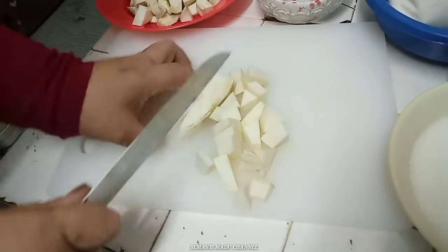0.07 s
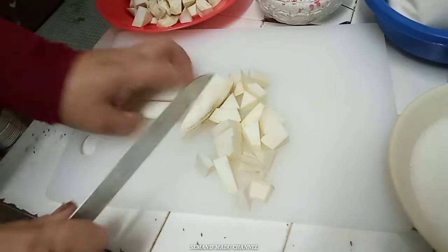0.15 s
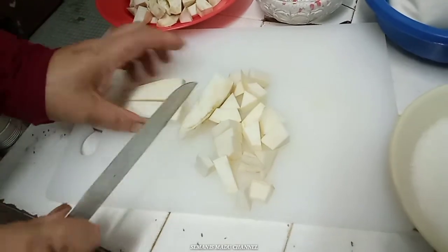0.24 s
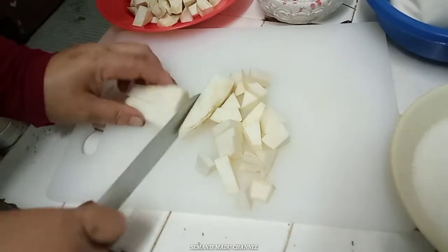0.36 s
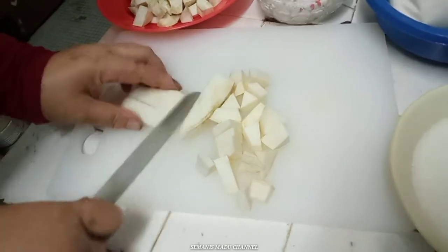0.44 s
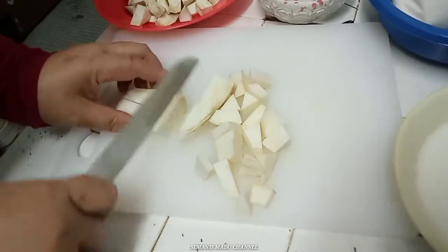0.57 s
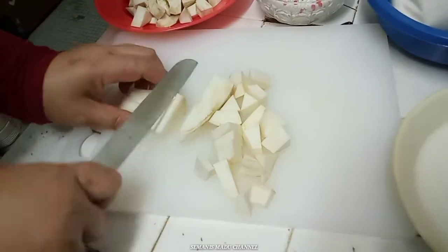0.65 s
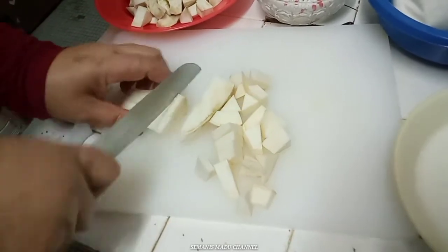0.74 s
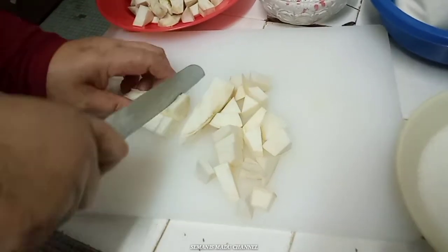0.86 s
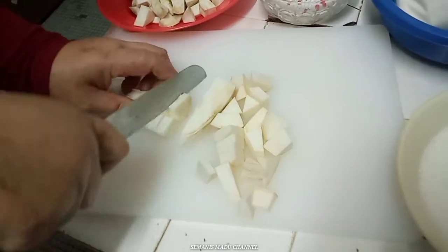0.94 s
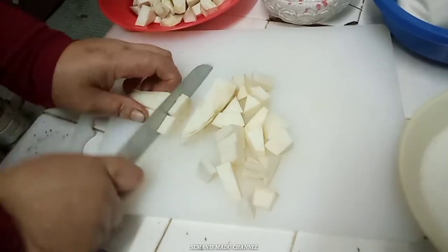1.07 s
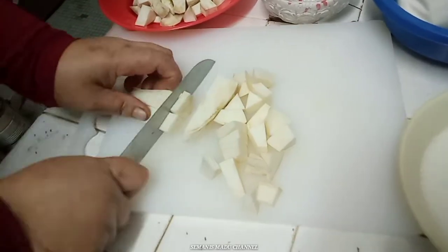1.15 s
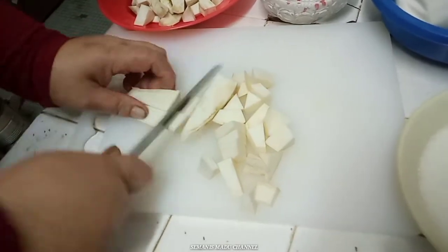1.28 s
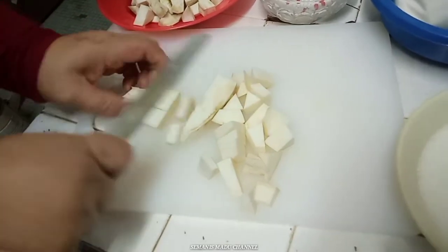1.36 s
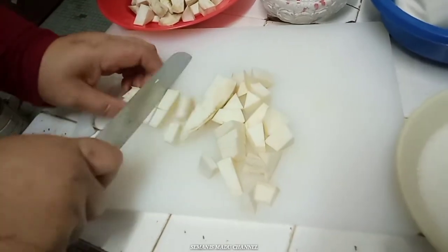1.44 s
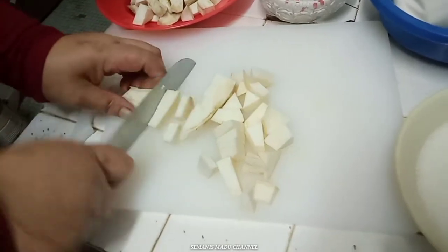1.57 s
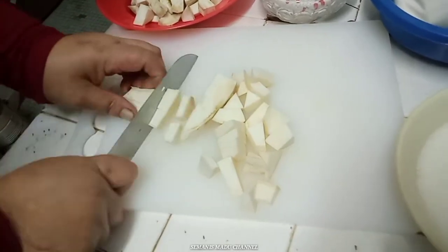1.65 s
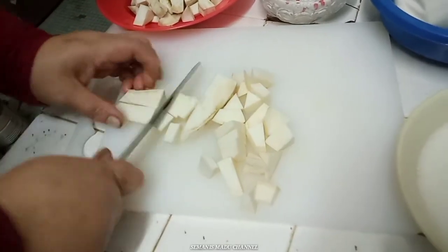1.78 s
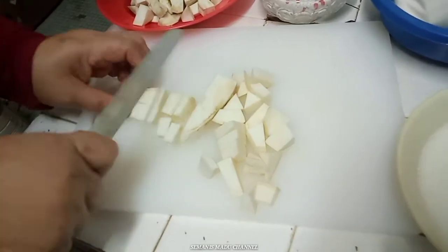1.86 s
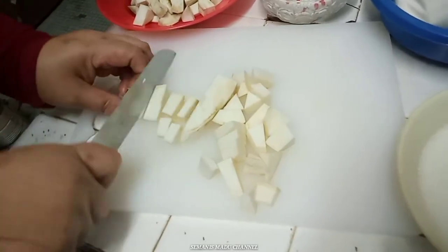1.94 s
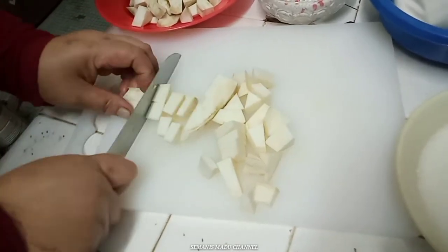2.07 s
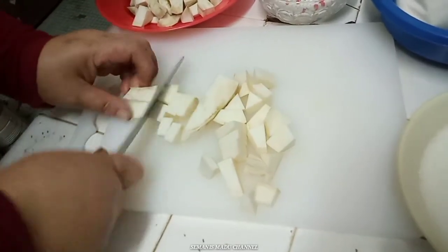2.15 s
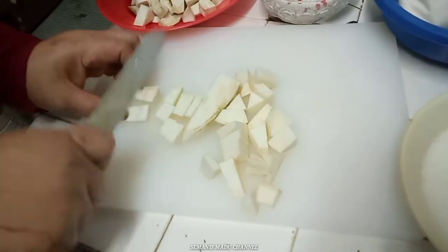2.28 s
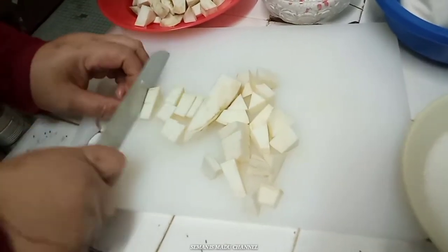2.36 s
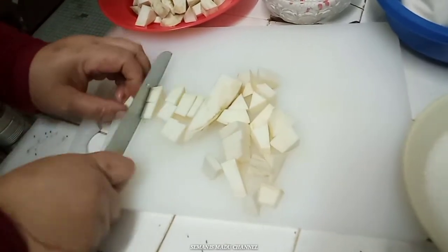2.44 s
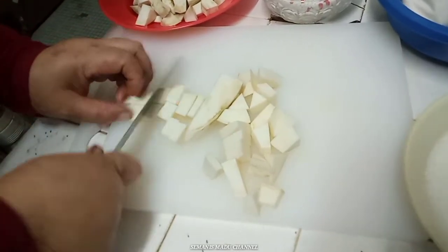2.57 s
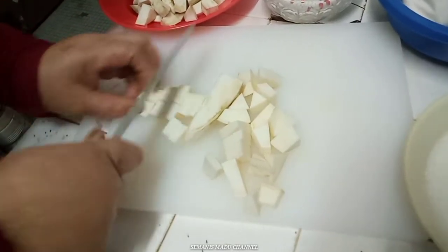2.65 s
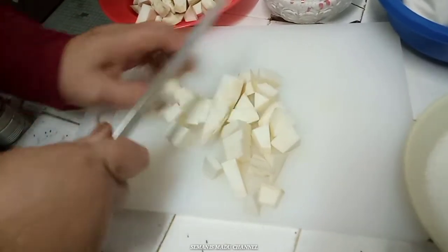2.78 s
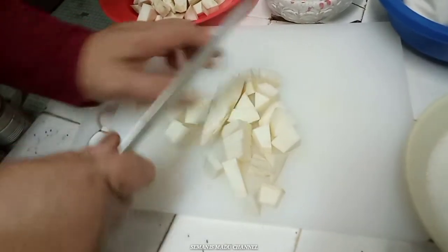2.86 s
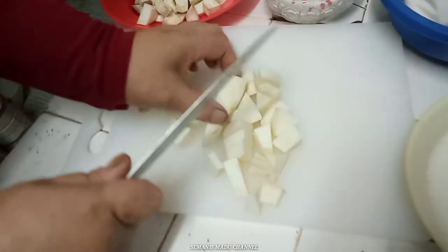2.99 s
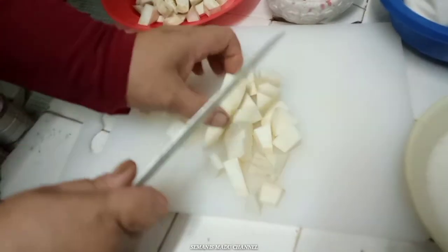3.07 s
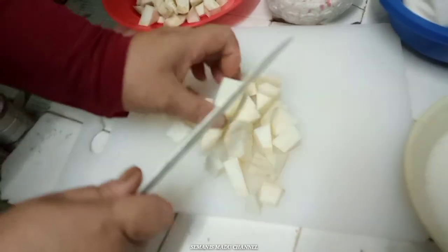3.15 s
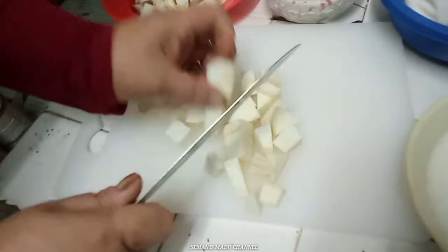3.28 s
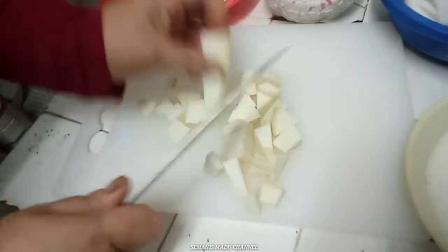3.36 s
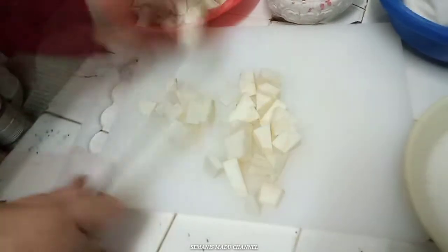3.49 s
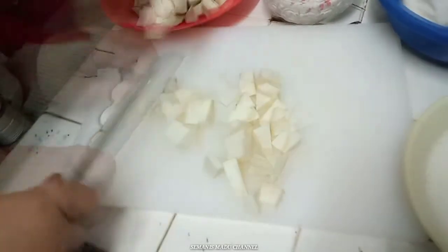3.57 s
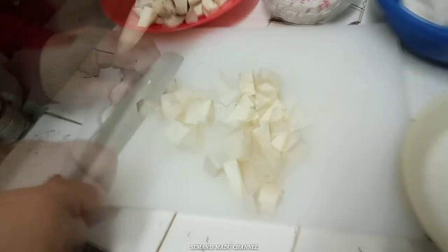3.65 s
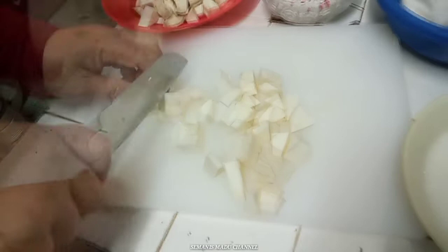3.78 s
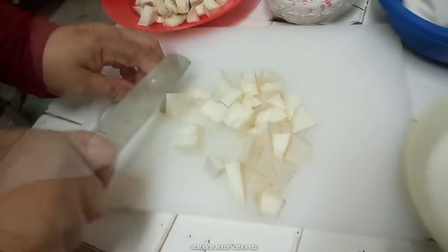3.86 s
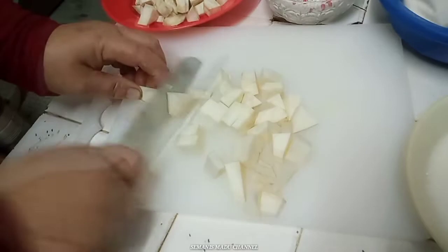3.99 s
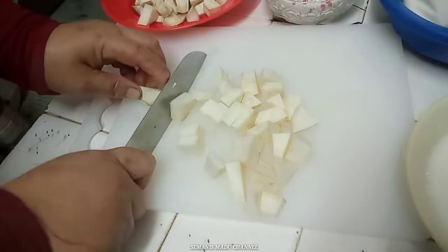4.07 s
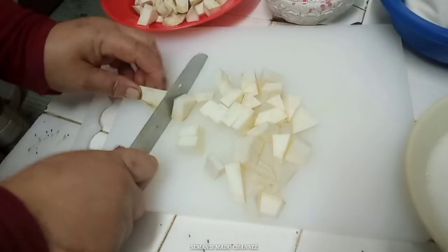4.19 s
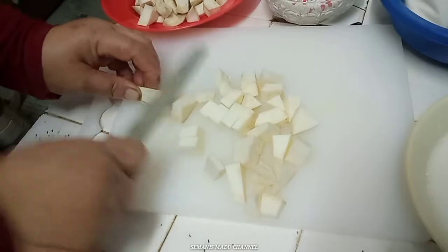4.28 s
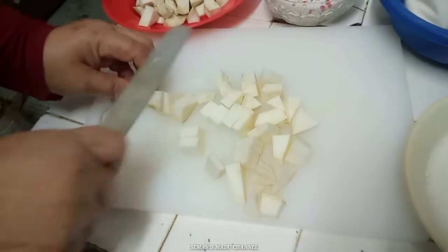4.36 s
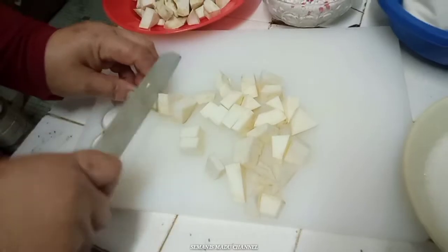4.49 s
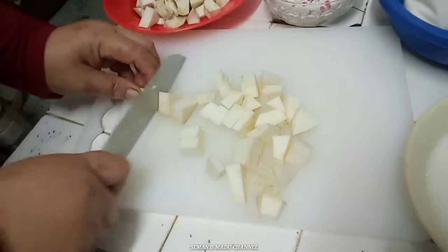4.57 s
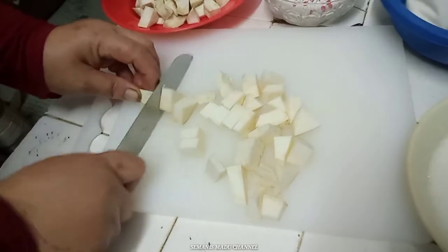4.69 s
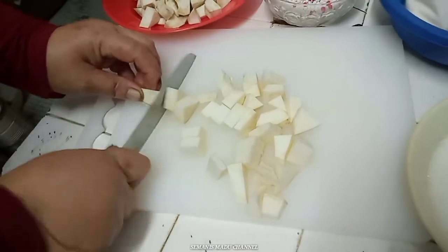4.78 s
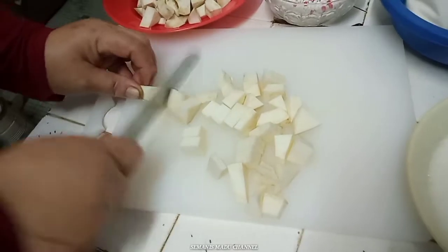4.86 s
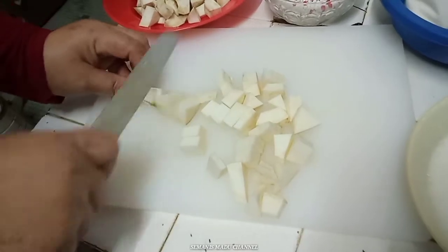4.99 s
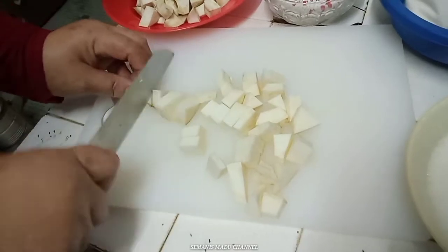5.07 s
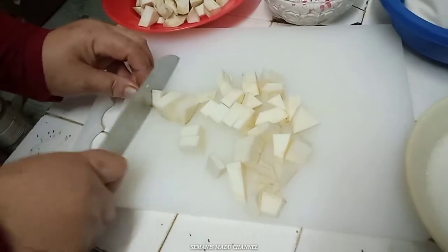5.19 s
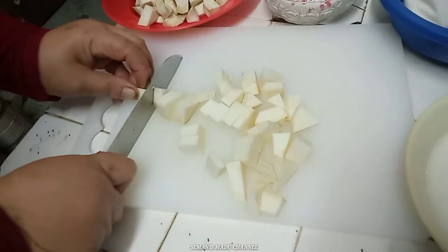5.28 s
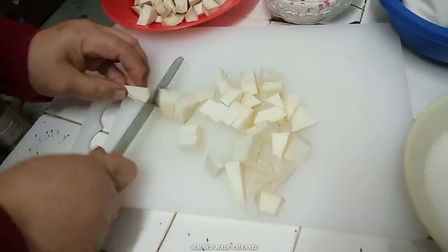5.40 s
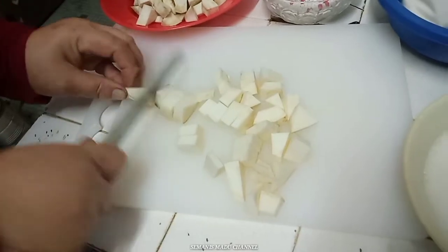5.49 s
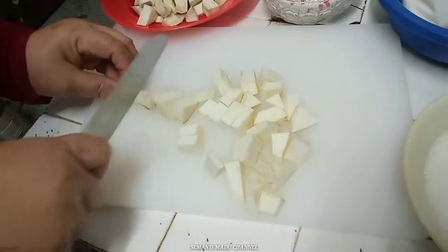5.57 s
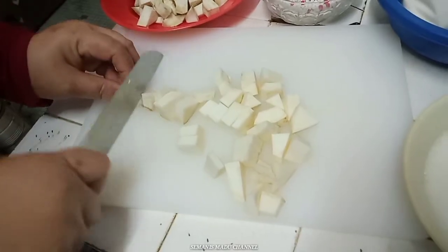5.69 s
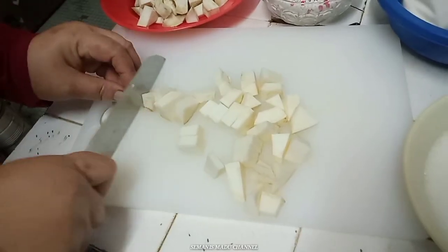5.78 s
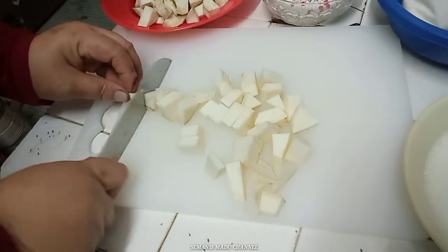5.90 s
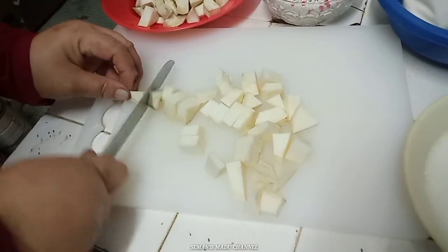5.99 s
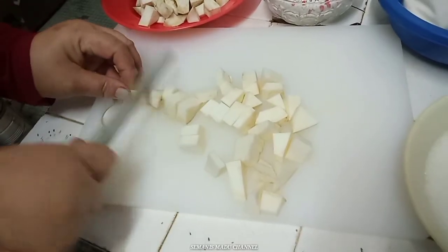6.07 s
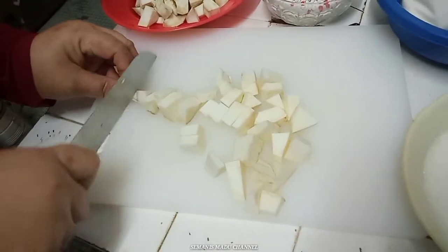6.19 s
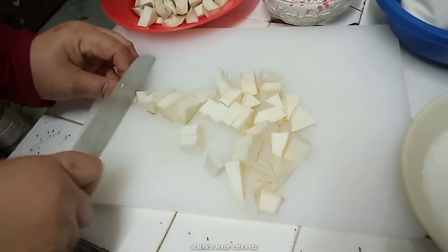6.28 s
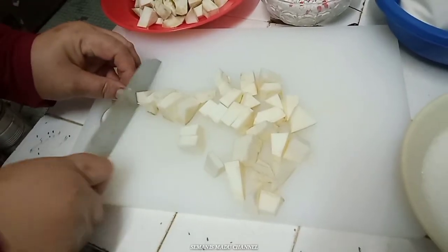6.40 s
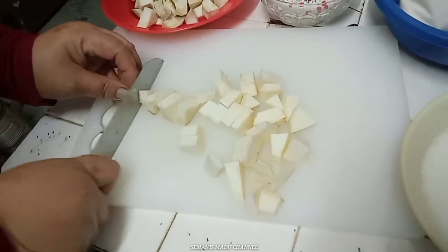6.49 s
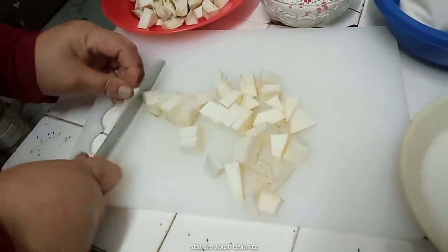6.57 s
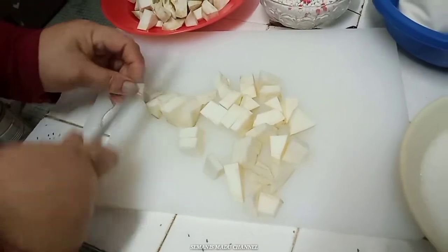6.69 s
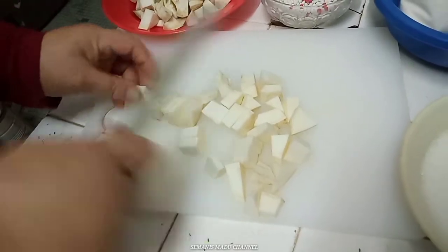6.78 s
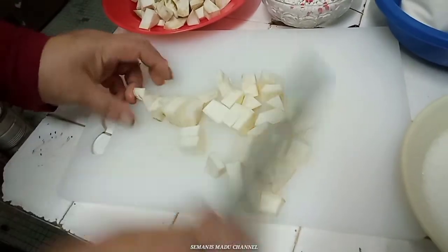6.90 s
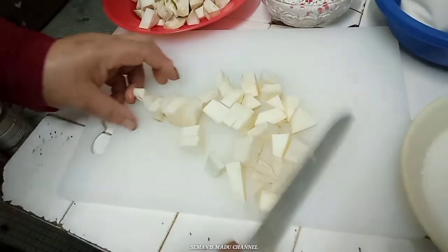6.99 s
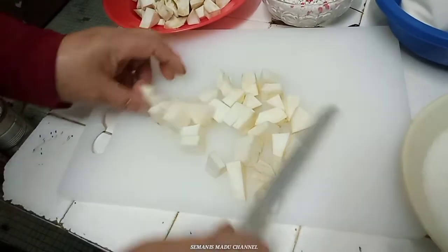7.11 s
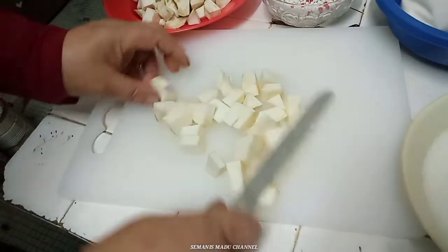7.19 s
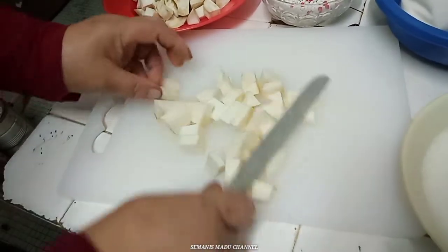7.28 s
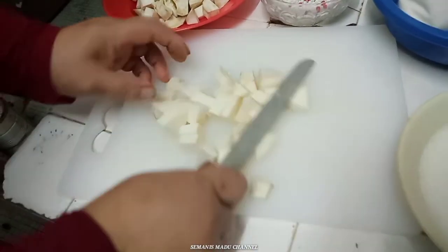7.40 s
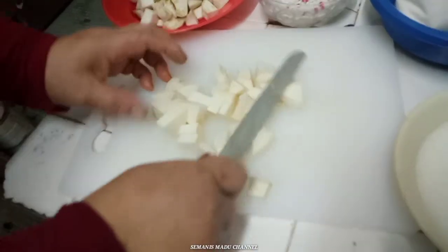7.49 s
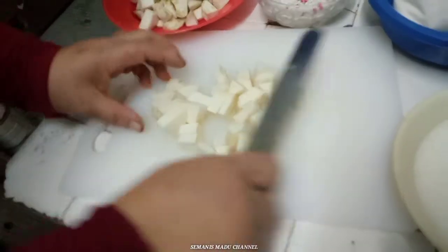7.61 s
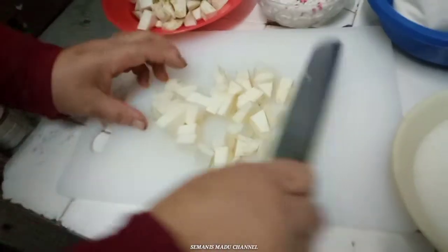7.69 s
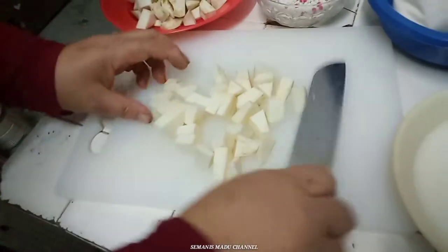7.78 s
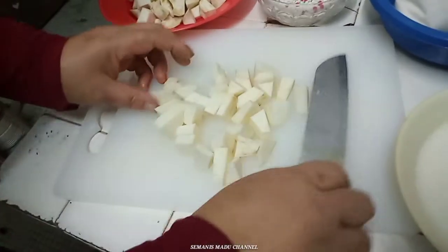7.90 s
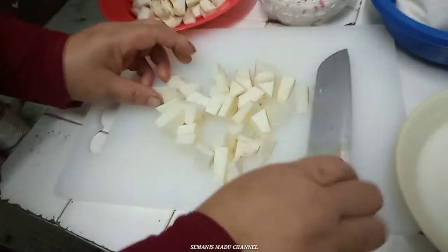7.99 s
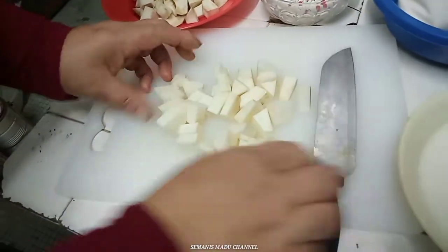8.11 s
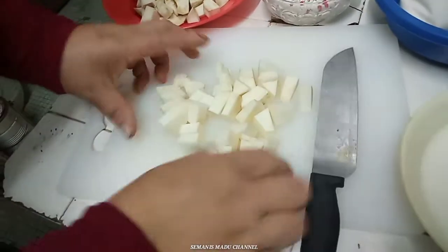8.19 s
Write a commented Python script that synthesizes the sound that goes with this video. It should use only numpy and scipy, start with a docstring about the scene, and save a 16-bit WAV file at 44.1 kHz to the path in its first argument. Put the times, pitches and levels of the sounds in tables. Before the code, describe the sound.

A knife dices a firm vegetable on a plastic board with sharp knocks over a low hum, then clatters down, ringing.

```python
"""Dicing a vegetable in a tiled kitchen

One microphone close to a plastic board, a low steady hum behind it. The knife rasps through firm flesh
and knocks on the board, hard enough that the loudest knocks clip; cubes bump softly between the cuts.
The sound drops out and fades back in. At the end the knife clatters down and its steel rings."""
import sys
import numpy as np
from scipy import signal
from scipy.fft import rfft, irfft, next_fast_len
from scipy.io import wavfile

SR = 44100
rng = np.random.default_rng(int(sys.argv[2]) if len(sys.argv) > 2 else 0)


def store_wav(level_fs):
    """Save 16-bit WAV to argv[1]."""
    pcm = np.round(np.clip(np.atleast_2d(level_fs), -1, 1) * 32767)
    wavfile.write(sys.argv[1], SR, pcm.T.astype(np.int16))


N = 363825
TIME = np.arange(N) / SR

# the edge hits the board: (t/s, force/dB, bass/dB, treble/dB, room/dB, number of blows, level dip/dB)
CHOPS = [(0.8411, 1.2, 5.5, -13, -10.5, 1, 0), (1.4632, 0.5, -6.5, -23, -7, 4, -2.5),
         (1.9491, 12.5, -8.5, 6, -10.5, 1, 6), (2.3424, 5.5, -9.5, -2, -4.5, 1, 4.5),
         (4.0281, 18.5, -34, -10, -9, 1, 6), (4.6800, 5.5, 7.5, -26, -5, 1, 1),
         (5.2663, 12, -3.5, -12, -8.5, 1, 0.5), (5.8820, 18, -7, 2, -12.5, 1, 11.5),
         (6.4470, 10.5, -1, -2, -10, 1, 0.5)]
# spectrum of moist flesh crackling: (f/Hz, level/dB)
CRACKLE = [(1000, -12), (3800, 6.5), (5200, 2.5), (9000, -11), (11000, -21), (15500, -13)]


def from_db(db):
    """Decibels to gain."""
    return 10 ** (np.asarray(db) / 20)


def rms_one(x):
    """Scale to rms 1."""
    return x / np.sqrt(np.mean(x ** 2) + 1e-20)


def at_hz(points, hz):
    """Read a table on a log-frequency axis."""
    knots, values = np.transpose(points)
    return np.interp(np.log(np.maximum(hz, 1)), np.log(knots), values)


def add(track, s, sound):
    """Mix a sound in at s seconds."""
    at = round(s * SR)
    track[at:at + len(sound)] += sound[:max(N - at, 0)]


def butter(x, hz, kind, order):
    """Causal Butterworth filter."""
    return signal.sosfilt(signal.butter(order, hz, kind, fs=SR, output="sos"), x)


def colour(x, spectrum):
    """Give a steady signal a spectrum; rms 1."""
    size = next_fast_len(len(x))
    gain = from_db(at_hz(spectrum, np.fft.rfftfreq(size, 1 / SR)))
    return rms_one(irfft(rfft(x, size) * gain, size)[:len(x)])


def resonate(x, hz, width):
    """Resonance with gain 1 at its peak; width in Hz."""
    r = np.exp(-np.pi * width / SR)
    feedback = [1, -2 * r * np.cos(2 * np.pi * hz / SR), r * r]
    return signal.lfilter(np.array([1, 0, -1]) * (1 - r * r) / 2, feedback, x)


def grains(per_s, spread_db, size):
    """Random clicks of uneven strength and sign."""
    strength = from_db(spread_db * np.minimum(rng.exponential(1, size), 4))
    return strength * rng.choice([-1, 1], size) * (rng.random(size) < per_s / SR)


def hum(rush_db=-40.5):
    """Room tone: a steady low rush with a few blurred tones."""
    # spectrum of the rush: (f/Hz, level/dB)
    rush_spectrum = [(20, -8), (55, -13), (85, -4), (135, -1), (420, -1), (560, -5.5), (1100, -6),
                     (2300, -14), (3700, -12.5), (4600, -18), (5100, -22.5), (8500, -33.5), (11000, -51.5),
                     (15500, -47)]
    # tones in the hum: (f/Hz, width/Hz, level/dB)
    drone = [(143.4, 37, -53.5), (230.9, 24, -52), (467.4, 17, -51), (684, 23, -63.5), (967, 48, -54.5),
             (1753, 15, -60.5)]
    tones = np.zeros(N)
    for hz, width, db in drone:
        band = resonate(rng.standard_normal(N), hz, width)
        tones += from_db(db) * rms_one(resonate(band, hz, width))
    return from_db(rush_db) * colour(rng.standard_normal(N), rush_spectrum) + tones


def kitchen_response(build_s=0.0011, wall_s=0.038, wall_spread_s=0.0053, wall_db=3):
    """Diffuse reverberation that swells as the far walls answer and dies band by band; energy 1."""
    # decay of the tiled room: (f/Hz, t60/s)
    decay_times = [(200, 0.57), (1000, 0.4), (2000, 0.43), (3200, 0.29), (4500, 0.15), (12000, 0.45)]
    t = TIME[:SR // 2]
    edges_hz = np.geomspace(60, 17000, 15)
    white = rng.standard_normal((2, len(t)))
    tail = np.zeros(len(t))
    for k, (low, high) in enumerate(zip(edges_hz, edges_hz[1:])):
        t60 = at_hz(decay_times, np.sqrt(low * high))
        tail += butter(white[k % 2], [low, high], "band", order=2) * from_db(-60 * t / t60)
    swell = from_db(wall_db * np.exp(-((t - wall_s) / wall_spread_s) ** 2))
    build = 1 - np.exp(-t / build_s)
    return rms_one(tail * swell * build) / np.sqrt(len(t))


def in_room(sound, room_db):
    """What reaches the microphone: direct sound, near echoes and a tail drawn anew each time."""
    # reflections off counter, bowls and walls: (delay/s, gain)
    echoes = [(.0022, .16), (.0036, -0.24), (.0060, 0.035), (0.0107, 0.18), (0.0325, 0.032),
              (.0430, -0.021)]
    response = from_db(room_db) * kitchen_response()
    response[0] += 1
    for delay, gain in echoes:
        response[round(delay * SR)] += gain
    return signal.fftconvolve(sound, response)


def board(force, bass_db, treble_db, contact_hz, spread_hz=1550, radiate_hz=170):
    """The damped board; where and how it is hit tilts its modes, and the contact time cuts the top."""
    # modes of the plastic board: (f/Hz, width/Hz, level/dB)
    modes = [(265, 240, -16.5), (423.4, 200, -19), (754, 190, -10.5), (1078, 160, -3.5), (1420, 183, -3.5),
             (1886, 360, -4.5), (2470, 240, -10), (2850, 740, -4), (3440, 240, -17)]
    tilt = [(600, bass_db), (1450, 0.012), (2900, treble_db)]
    body = sum(resonate(force, hz, width) * from_db(db + at_hz(tilt, hz)) for hz, width, db in modes)
    # bending waves disperse: all-passes spread the blow over a few cycles
    for hz in (1400, 2700):
        body = body - 2 * resonate(body, hz, spread_hz)
    body = butter(body, radiate_hz, "high", order=2)  # a small plate radiates no deep bass
    body = butter(body, contact_hz, "low", order=4)
    return butter(body, 3900, "low", order=6)


def bumps(level_db=24, crackle_db=-22, room_db=-5):
    """Moist cubes cushion a contact into a cluster of tiny blows; crisp ones last longer and crackle."""
    # soft bumps of blade and cubes: (t/s, level/dB, crispness 0-1)
    contacts = [(1.064, -17, 0), (1.208, -16.5, 0.62), (1.434, -22, .9), (1.529, -20.5, 0.8),
                (1.705, -22.5, 0.85), (1.921, -11.5, 0.8), (2.103, -17.5, 0.94), (2.251, -23.5, 0.88),
                (2.313, -14, .8), (2.503, -13, .75), (6.358, -18.5, 0.64), (6.587, -14, 0.8),
                (7.147, -23.5, 0.05), (7.565, -23, .05), (8.177, -6, 0.1), (8.218, -9, .6)]
    # a dull bump and a crisp snap of the flesh: (decay/s, bass/dB, treble/dB, crackle/dB)
    dull, crisp = np.array([(0.0025, 14.5, -25.5, -15), (0.01, 5, 6, -0.5)])
    out, t = np.zeros(N), TIME[:SR // 10]
    for s, db, crispness in contacts:
        decay_s, bass_db, treble_db, wet_db = dull + crispness * (crisp - dull)
        fade = np.exp(-t / decay_s)
        force = rms_one(grains(3300, spread_db=2.8, size=len(t)) * fade) / np.sqrt(len(t))
        thud = from_db(level_db) * board(force, bass_db, treble_db, contact_hz=3900)
        clicks = colour(grains(1800, spread_db=7, size=len(t)), CRACKLE)
        crackle = from_db(crackle_db + wet_db) * clicks * fade
        add(out, s, from_db(db) * (thud + crackle))
    return in_room(out, room_db)[:N]


def squeak(hz=2850, width_hz=300, slips_per_s=58, slip_s=0.0023):
    """Flesh sticks and slips on the side of the blade, an uneven train of short chirrs; rms 1."""
    slip_times = np.append(0, np.cumsum(rng.uniform(0.6, 1.4, size=1000)) / slips_per_s)
    since_slip = TIME - slip_times[np.searchsorted(slip_times, TIME, "right") - 1]
    friction = rng.standard_normal(N) * np.exp(-since_slip / slip_s)
    return rms_one(resonate(resonate(friction, hz, width_hz), hz, 2 * width_hz))


def slices(cells_per_s=900, crackle_db=-58, release_s=0.032, room_db=-6):
    """Cells burst along the edge and the flesh squeaks as pressure builds through each stroke."""
    # the blade passes through the flesh: (start/s, end/s, rasp/dB, squeak/dB)
    strokes = [(0.941, 0.987, -31, -66), (1.871, 1.903, -35.5, -41), (2.278, 2.304, -35, -44),
               (4.46, 4.686, -47.5, -47), (5.107, 5.266, -41, -41.5), (5.676, 5.856, -43.5, -45),
               (6.307, 6.44, -43, -38)]
    # spectrum of the bursting cells: (f/Hz, level/dB)
    flesh_spectrum = [(300, -14.5), (900, 3), (1800, -0.5), (3900, -5.5), (5200, -21.5), (9000, -31.5),
                      (15500, -46.5)]
    rasp = colour(grains(cells_per_s, spread_db=3.5, size=N), flesh_spectrum)
    crackle = from_db(crackle_db) * colour(grains(600, spread_db=3, size=N), CRACKLE)
    chirr = squeak()
    out = np.zeros(N)
    for start, end, rasp_db, squeak_db in strokes:
        pressure = np.sqrt(np.interp(TIME, [start, end, end + release_s], [0, 1, 0]))
        out += pressure * (from_db(rasp_db) * rasp + crackle + from_db(squeak_db) * chirr)
    return in_room(out, room_db)[:N]


def shimmer(t, spectrum, level_db=-24, t60=0.22):
    """A crowd of weak high modes of the steel rings on after a clash."""
    hz = rng.uniform(4500, 15500, size=(90, 1))
    partials = from_db(at_hz(spectrum, hz)) * np.sin(2 * np.pi * (hz * t + rng.random(hz.shape)))
    return rms_one(partials.sum(axis=0)) * from_db(level_db - 60 * t / t60)


def clinks(attack_s=0.00063, clash_s=0.0095, damping_db_per_s=220, room_db=-9):
    """Steel buzzes on a hard surface for an instant, then rings; the contact point picks the modes."""
    # touches of the steel: (t/s, ring/dB, focus f/Hz, fall from it/dB per octave, t60 factor, clash/dB)
    touches = [(2.506, -24, 4310, 71, 0.58, -58), (7.798, -33.5, 3289, 54, 1.6, -32),
               (8.02, -16.5, 4200, 0.5, 1.1, -10), (8.129, -18, 3260, 1.5, 1, -9.5),
               (8.22, -23.5, 3190, 11, 1.3, -19)]
    # modes of the steel blade: (f/Hz, level/dB, t60/s)
    blade_modes = [(614, 2, .25), (1120, -8, .2), (1443, -9, .3), (1513, -9, .16), (1750, -5, .15),
                   (2277, -15, .25), (3289, -3, .36), (3611, 2, .15), (4107, -2, .33), (7940, -21, .2),
                   (8355, -19, .22), (8845, -19, .24), (3840, -13, .25), (4600, -20, .25), (6290, -27, .25),
                   (10280, -25, .12), (13700, -24, .06)]
    # spectrum of the clash: (f/Hz, level/dB)
    clash_spectrum = [(300, -6), (600, 14), (2000, 0), (3600, 10), (5200, -5), (9000, -15), (12000, -20.5),
                      (15500, -33)]
    out, t = np.zeros(N), TIME[:SR // 2]
    hz, mode_db, t60 = np.transpose(blade_modes)[:, :, None]
    attack = 1 - np.exp(-t / attack_s)
    next_times = [row[0] for row in touches[1:]] + [np.inf]
    for (s, ring_db, focus_hz, fall_db, sustain, clash_db), next_s in zip(touches, next_times):
        struck_db = ring_db + mode_db - fall_db * np.abs(np.log2(hz / focus_hz))
        # the next touch damps this ring
        decay_db = 60 * t / (t60 * sustain) + damping_db_per_s * np.maximum(s + t - next_s, 0)
        partials = rng.choice([-1, 1], hz.shape) * np.sin(2 * np.pi * hz * t)
        ring = np.sum(from_db(struck_db - decay_db) * partials, axis=0)
        clash = colour(grains(9000, spread_db=2.4, size=len(t)), clash_spectrum) * np.exp(-t / clash_s)
        add(out, s, attack * (ring + from_db(clash_db) * shimmer(t, clash_spectrum)))
        add(out, s, in_room(from_db(clash_db) * attack * clash, room_db))
    return out


def knock(db, bass_db, treble_db, room_db, blows, gap_s=0.0035, gap_spread=0.3, loss_db=0.5):
    """One sharp blow on the board, or an uneven chatter of several, heard in the room."""
    force, s = np.zeros(SR // 15), 0
    for k in range(blows):
        force[round(s * SR)] = from_db(db - k * loss_db)
        s += gap_s * (1 + gap_spread * rng.uniform(-1, 1))
    # a harder blow has more treble and a shorter contact: the cut-off rises an octave per 69 dB
    contact_hz = 2850 * 2 ** (treble_db / 69)
    return in_room(board(force, bass_db, treble_db, contact_hz), room_db)


def slaps(force_db=24, thump_hz=99, thump_width_hz=30, thump_db=25.5):
    """The knife drops flat, each landing a double knock; its weight shakes the counter with a thump."""
    # heel and tip land on the board in turn: (t/s, force/dB)
    landings = [(8.0198, 0.5), (8.116, -6.5), (8.1298, -16)]
    counter = resonate(signal.unit_impulse(SR // 4), thump_hz, thump_width_hz)
    thump = butter(counter, 2 * thump_hz, "low", order=2)
    out = np.zeros(N)
    for s, db in landings:
        add(out, s, knock(force_db + db, bass_db=6.5, treble_db=5.5, room_db=-8.5, blows=2))
        add(out, s, from_db(thump_db + db) * thump)
    return out


def chops(force_db=24, room_lift_db=2):
    """The flesh gives way and the edge hits the board."""
    out = np.zeros(N)
    for s, db, bass_db, treble_db, room_db, blows, _ in CHOPS:
        add(out, s, knock(force_db + db, bass_db, treble_db, room_lift_db + room_db, round(blows)))
    return out


def dropout(drop_s=2.63, return_s=3.32, switch_s=0.03, depth_db=-28, fade_s=1.62, fade_power=1.76):
    """Gain that shuts, reopens low and eases back up to full."""
    is_open = np.clip(np.maximum(drop_s - TIME, TIME - return_s) / switch_s, 0, 1)
    fade_left = np.clip(1 - (TIME - return_s) / fade_s, 0, 1) * (TIME > return_s)
    return is_open * from_db(depth_db * fade_left ** fade_power)


def dips(lead_s=0.028, fall_s=0.0074, recovery_s=0.035):
    """Gain that sinks just ahead of a chop and recovers through its tail; a negative dip lifts it."""
    corners_s = [-lead_s, fall_s - lead_s, 0, recovery_s]
    dips_db = sum(depth_db * np.interp(TIME - s, corners_s, [0, 1, 1, 0]) for s, *_, depth_db in CHOPS)
    return from_db(-dips_db)


def scene():
    """Knife, board and room tone at one close microphone."""
    return (chops() + slaps() + bumps() + slices() + clinks() + hum())[None]


def record(dry, low_cut_hz=55, high_cut_hz=15700):
    """The port colours the treble, the level drops out and dips, hard blows clip, the band is cut."""
    # peaks and notches of the microphone port: (f/Hz, width/Hz, gain/dB)
    port = [(5370, 1500, -7.5), (6684, 150, 5.5), (7520, 550, -4.5), (8640, 350, 3.5), (9400, 570, -10)]
    for hz, width, db in port:
        dry = dry + (from_db(db) - 1) * resonate(dry, hz, width)
    clipped = np.clip(dry * dropout() * dips(), -1, 1)
    high_cut = signal.ellip(10, 0.1, 70, high_cut_hz, fs=SR, output="sos")
    return signal.sosfilt(high_cut, butter(clipped, low_cut_hz, "high", order=2))


dry = scene()
out = record(dry)
store_wav(out)
```